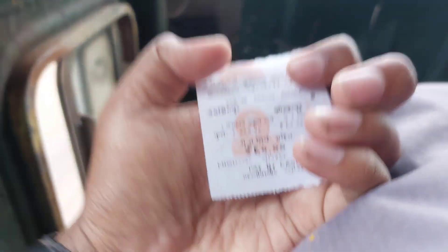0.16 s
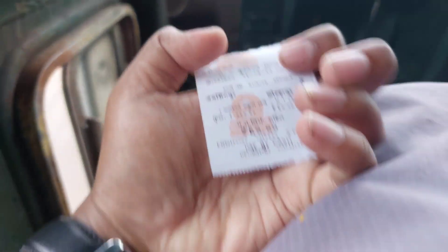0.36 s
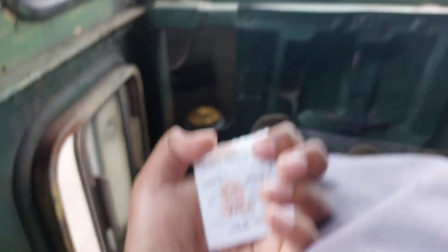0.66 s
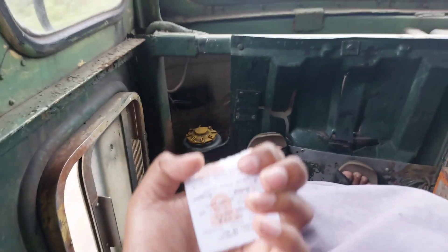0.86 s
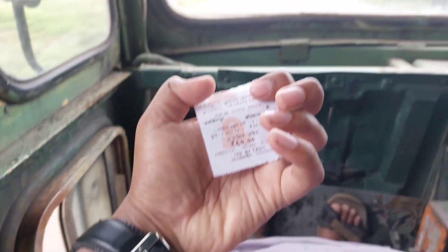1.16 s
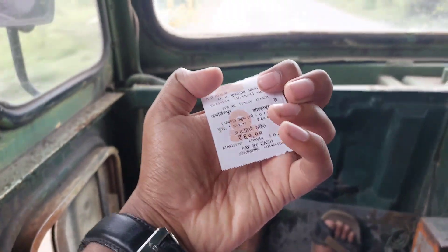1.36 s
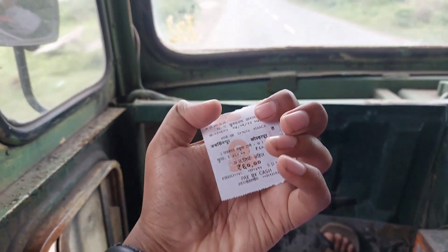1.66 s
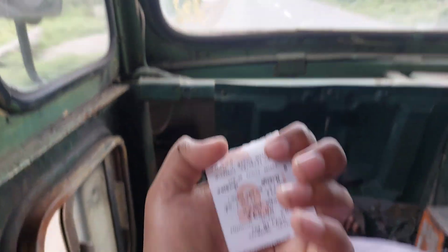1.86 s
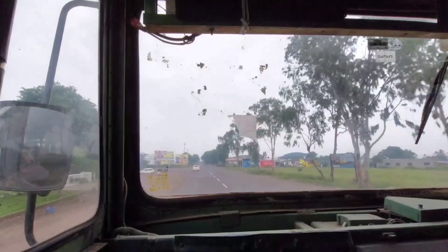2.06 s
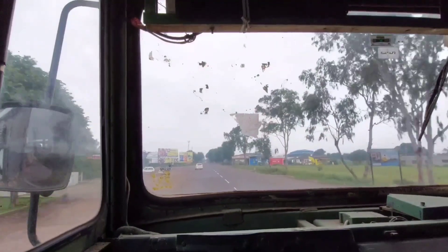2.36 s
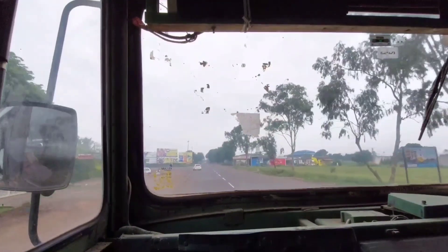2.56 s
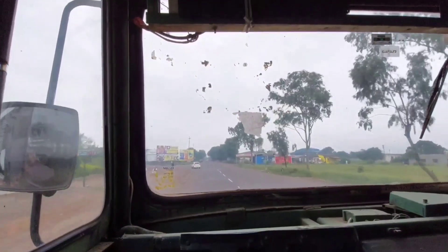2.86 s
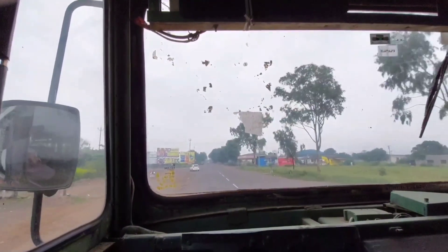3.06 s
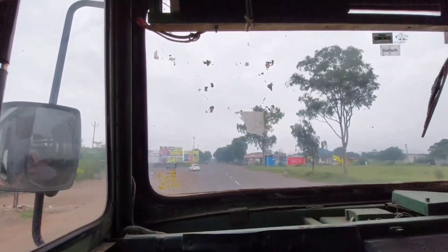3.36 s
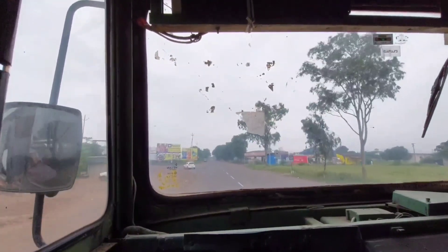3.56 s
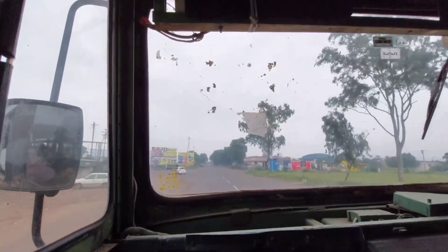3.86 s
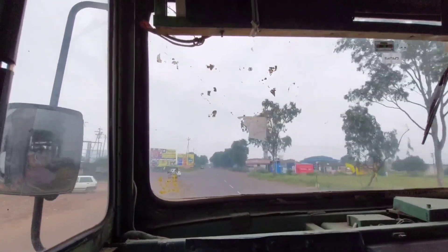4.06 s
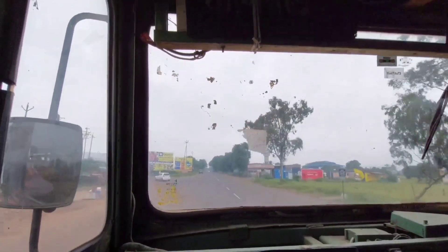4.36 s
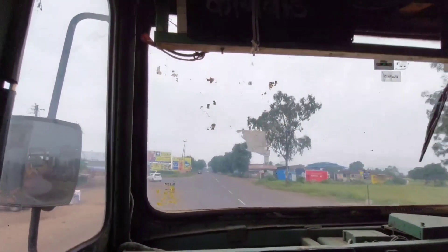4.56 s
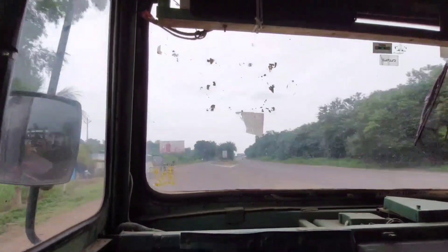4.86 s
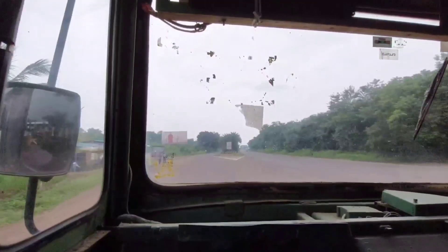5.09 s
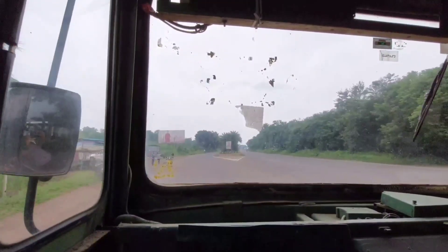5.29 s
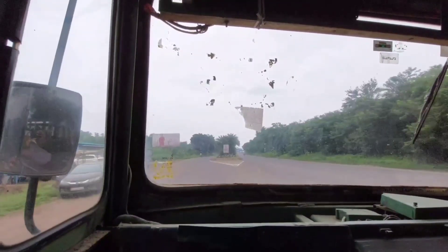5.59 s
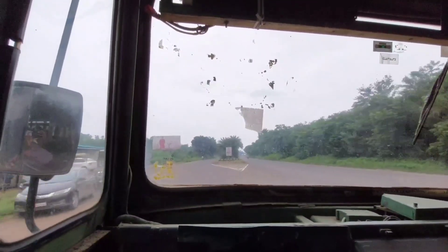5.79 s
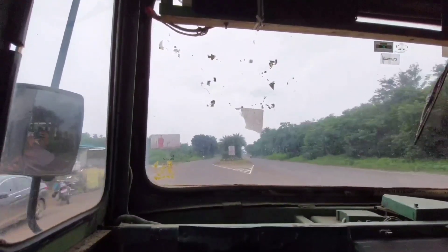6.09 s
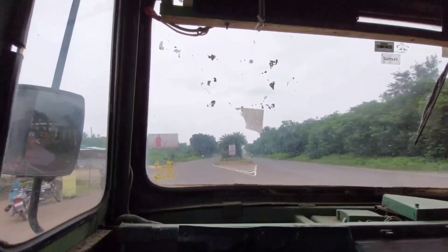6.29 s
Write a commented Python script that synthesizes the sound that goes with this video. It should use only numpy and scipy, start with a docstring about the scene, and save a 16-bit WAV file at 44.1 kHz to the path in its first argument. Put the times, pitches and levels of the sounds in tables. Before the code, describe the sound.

Inside a moving bus near the driver, a six-cylinder diesel drones loudly under low body rumble, road roar and wind hiss, with loose fittings rattling and metal squeaking. Just before two seconds a small hiss puff comes on the right and everything cuts to silence. Clicks bring back a far quieter ride, the engine sagging slowly, then another hard cut to a lower hum with a late rattle and squeak. Handheld wide stereo microphone.

```python
"""A six-cylinder diesel hums in crank orders inside a moving bus, heard from near the driver.
Three stretches of the ride are joined by hard cuts, the first loud and with a silence after it. Diffuse noise
makes body rumble, road roar and wind hiss; a turbocharger whines faintly on a gliding sine. Noise bursts
make ticks, rattles of loose fittings and a puff; wavering sines make squeaks and thin tones, and clicks are
decaying jumps. A two-port microphone hears the cabin, its ports less alike towards the treble."""
import sys
import numpy as np
from scipy import signal
from scipy.fft import rfft, irfft
from scipy.io import wavfile
from scipy.ndimage import uniform_filter1d, map_coordinates

SR = 44100
rng = np.random.default_rng(int(sys.argv[2]) if len(sys.argv) > 2 else 0)


def store_wav(level_fs):
    """Save 16-bit WAV to argv[1]."""
    pcm = np.round(np.clip(np.atleast_2d(level_fs), -1, 1) * 32767)
    wavfile.write(sys.argv[1], SR, pcm.T.astype(np.int16))


N = 283563

# the three stretches: (start t/s, end t/s, fade-in time/s, level the fade starts from/dB)
STRETCHES = [(0, 1.8088, .001, 0), (1.9498, 4.7822, .02, -20), (4.7822, 6.5, .018, -12)]
# cabin noise, one list a stretch: (t/s, rumble level/dB, roar level/dB, hiss level/dB, top hiss level/dB)
NOISE_LEVELS = [
    [(0, -20.5, -28.5, -39.5, -52), (.6, -21.5, -26.5, -37, -43.5), (1.1, -22, -27.5, -40, -51.5),
     (1.8, -22.5, -26.5, -39, -57.5)],
    [(1.97, -41, -49, -58, -77), (2.8, -44.5, -50.5, -59.3, -77), (4.4, -46.5, -49, -59.5, -76),
     (4.78, -42, -46.5, -56.5, -68)],
    [(4.81, -41.5, -51, -60, -82), (5.05, -41.5, -52, -59.5, -83), (5.4, -42.5, -54, -62, -83),
     (6.43, -43.5, -52, -61, -81)],
]
# cabin noise colour: (f/Hz, relative level per Hz/dB in each of the three stretches)
NOISE_COLOUR = [(40, -4, 5, -1), (62, 6.5, 9, 5), (138, -1, 2.5, -3.5), (258, 0.5, 3, -3.5),
                (363, -8, -9, -14), (534, -14, -12.5, -15), (740, -16.5, -15, -18),
                (1135, -17.5, -19, -19.5), (2360, -28, -26.5, -29), (3450, -34, -34, -35),
                (4920, -30, -34.5, -30.5), (7120, -39.5, -38.5, -41), (9700, -48.5, -48, -51.5),
                (12100, -42.5, -37.5, -46.5), (15600, -50.5, -39, -49)]
# panels and glass that ring along with the noise: (f/Hz, width/Hz, lift/dB in each of the three stretches)
PANELS = [(343, 13, 1.8, 3, 2.5), (489, 49, -0.76, 5.2, 3.4), (764, 58, 1.6, 3.9, 5), (856, 20, 2, 3, 0.67),
          (1066, 27, 1.5, 7.4, 6.3), (1243, 50, 0, 4.8, 3.2), (1482, 54, 0.5, 2, 6.8),
          (1605, 75, -2, 3.3, 1), (2160, 69, -0.5, 2.2, 2.2), (2560, 150, 0.5, 2.1, 2)]
SWELL_DB = 0.55  # slow random heave shared by all the noise bands, rms

# left over right, by how the hand holds the ports: (f/Hz, level/dB in each of the three stretches)
PORT_LEAN = [(99.5, -1, 0, 0.5), (800, -2, -1.5, -3), (2500, 1.5, 0.5, 4), (4460, -5.5, 0.5, -6),
             (6200, -5.5, -1, -5), (8300, 8, 4.5, 9), (11000, 0.5, 0, 3.5), (13000, 2.5, -5, 6),
             (15600, 15.5, 3, 10)]
# how alike the two ports hear the diffuse cabin: (f/Hz, likeness from 0 to 1)
PORT_LIKENESS = [(40, 0.93), (80, 0.94), (300, 0.78), (600, 0.42), (1000, 0.22), (1450, 0.394),
                 (2500, 0.13), (5000, .02)]
# phase of the right port against the left: (f/Hz, phase/rad)
PORT_PHASE = [(100, -0.07), (600, 0.14), (1000, -1.9), (1500, -2.5), (2300, -5.5), (3000, -5)]

# engine speed, one list a stretch; steady, then twice sagging slowly, with one short rev:
# (t/s, crank turns per s, hum strength/dB)
CRANK = [
    [(0, 24.47, 0), (.9, 24.56, 0), (1.8, 24.6, -1)],
    [(1.97, 23.0, -2), (2.4, 23.37, -1.5), (3.2, 23.0, 1.5), (4.5, 22.3, 1), (4.64, 23.4, -4),
     (4.78, 23.5, -9)],
    [(4.81, 20.1, -3), (5.14, 20.85, .5), (6.43, 19.65, .5)],
]
# crank orders that stand out of the rumble, firing on order 3; hum strength and pull come on top:
# (order, rms level/dB in each of the three stretches)
CRANK_ORDERS = [(3, -29, -55, -64), (4, -38, -58, -64), (4.5, -42, -55, -64), (6, -27, -42, -45),
                (7, -37, -62, -66), (7.5, -31, -52, -57), (8, -44, -62, -57), (9, -34, -54, -50),
                (10, -31, -55, -60), (10.5, -39, -55, -55), (11, -34, -62, -63), (12, -37, -47, -63),
                (13.5, -39, -68, -62), (15, -40, -62, -68), (16.5, -43, -72, -70), (17, -44, -74, -67),
                (22, -43, -72, -71), (24, -54, -68, -69), (27, -44, -76, -78), (31.5, -49, -76, -78),
                (36, -47, -72, -80), (37, -50, -78, -76), (42, -49, -80, -82), (49, -50, -80, -80),
                (51, -50, -80, -78), (72, -50, -82, -76)]
# orders that grow while the engine pulls hard, that is while the pedal aims above PULL_HZ
PULLING_ORDERS = (9, 10.5, 15, 16.5, 17)
PULL_DB, PULL_HZ, PULL_FADE_S = 8, 8500, .4
# each move of the pedal sets the pitch that the whine heads for: (t/s, aim f/Hz)
PEDAL = [(0, 9200), (.25, 11300), (.8, 9800), (.95, 6200), (4.5, 7900), (4.78, 5600)]
# turbocharger whine, one row a stretch: (starting f/Hz, rms level/dB)
TURBO = [(8450, -60), (7750, -74), (7950, -81)]
SPOOL_S = 1.3  # time constant of the glide

# high ticks: (t/s, starting rms level/dB)
TICKS = [(.1, -53), (2.38, -66), (4.755, -64), (4.97, -74), (5.638, -66), (5.77, -72), (5.942, -71),
         (6.165, -68), (6.205, -70)]
TICK_HZ, TICK_WIDTH_HZ, TICK_T60_S, TICK_PAN_DB = 12500, 4000, .1, 3
# wide rattles of loose fittings: (t/s, starting rms level/dB, centre f/Hz)
RATTLES = [(.408, -38, 4000), (.886, -33, 5500), (1.052, -37, 7000), (1.077, -35, 6000), (1.294, -37, 7500),
           (5.973, -57, 5540), (6.273, -63, 4500)]
RATTLE_WIDTH, RATTLE_T60_S, RATTLE_PAN_DB = 1.3, .12, -.5  # width as a share of the centre
# narrow squeaks: (t/s, starting rms level/dB, f/Hz, t60/s)
SQUEAKS = [(.795, -48, 9700, .08), (.886, -40, 3300, .08), (1.296, -36, 3300, .1), (5.972, -55, 4350, .15),
           (5.974, -53, 1440, .12), (5.985, -52, 1380, .12), (5.994, -53, 4390, .15)]
SQUEAK_WAVER = .025  # rms share of the pitch
# a puff of hiss on the right: (t/s, starting rms level/dB, centre f/Hz, width/Hz, t60/s, left over right/dB)
PUFF = (1.72, -35.5, 4920, 1500, 0.7, -12.5)
BURST = 8192  # samples that each tick, rattle, squeak and puff lasts at most
# clicks where a stretch sets in: (t/s, peak level/dB, sign)
CLICKS = [(1.9498, -38, 1), (1.9547, -35, -1), (1.9572, -42, 1), (1.962, -31, -1), (4.787, -44, 1),
          (4.802, -35, -1)]
CLICK_S = 0.00098  # decay time constant
# thin tones that come and go: (start t/s, end t/s, f/Hz, rms level/dB before the fades)
THIN_TONES = [(2.0, 5.5, 1104, -69), (3.93, 4.42, 1615, -66), (2.2, 3.4, 1600, -73), (3.0, 4.3, 2480, -76),
              (5.15, 5.35, 1440, -69)]
EDGE_HZ = 15780  # upper band limit


def gain_of(db):
    """Decibels to an amplitude factor."""
    return 10 ** (np.asarray(db) / 20)


def evened(x):
    """Scales to rms 1 on the mean of the channels."""
    return x / np.sqrt(np.mean(np.mean(np.atleast_2d(x), axis=0) ** 2) + 1e-20)


def read(points, hz, column=1):
    """Reads a table column on a log frequency axis."""
    table = np.transpose(points)
    return np.interp(np.log(hz + 1), np.log(table[0] + 1), table[column])


def follow(rows, t):
    """All columns of a curve table at times t."""
    s, *columns = np.transpose(rows)
    return [np.interp(t, s, column) for column in columns]


def drift(count, per_s):
    """Smooth random wander of rms 1 through per_s knots a second."""
    knots = rng.standard_normal(int(count * per_s / SR) + 4)
    return evened(map_coordinates(knots, [1 + np.arange(count) * per_s / SR], order=3))


def ports(hz, k):
    """Likeness, phase turn and left gain of the two ports; right gain is the inverse."""
    likeness = np.clip(read(PORT_LIKENESS, hz), 0, 1)
    turn = np.exp(1j * read(PORT_PHASE, hz))
    lean = gain_of(read(PORT_LEAN, hz, column=k + 1) / 2)
    return likeness, turn, lean


def tone(hz, db, k):
    """A sine that follows hz; it reaches the two ports by its own path, so with its own phase skew."""
    mean_hz = np.mean(hz)
    lean = ports(mean_hz, k)[2]
    phase = 2 * np.pi * (np.cumsum(hz) / SR + rng.random())
    skew = np.clip(.2 + mean_hz / 1500, 0, 1.3) * np.clip(rng.standard_normal(), -1.5, 1.5)
    pair = np.array([lean * np.cos(phase), np.cos(phase + skew) / lean])
    return gain_of(db) * evened(pair)


def decay(db, t60):
    """Level of a short sound: a quick soft onset, then a fall of 60 dB in t60 seconds."""
    u = np.arange(BURST) / SR
    return gain_of(db - 60 * u / t60) * (1 - np.exp(-u / .003))


def bursts(rows):
    """Noise around a centre pitch, unlike at the two ports, dying away exponentially."""
    out = np.zeros((2, N + BURST))
    hz = np.fft.rfftfreq(BURST, 1 / SR)
    for s, db, centre_hz, width_hz, t60, pan_db in rows:
        resonance = 1 / (1 + (2 * (hz - centre_hz) / width_hz) ** 2)
        band = evened(irfft(rfft(rng.standard_normal((2, BURST))) * resonance))
        pan = gain_of([[pan_db / 2], [-pan_db / 2]])
        out[:, round(s * SR):][:, :BURST] += band * decay(db, t60) * pan
    return out[:, :N]


def diffuse_spectrum(k, count):
    """Patchy noise frames of a diffuse field, coloured by the cabin and its ringing panels."""
    frames, hz = count // 512 + 8, np.fft.rfftfreq(2048, 1 / SR)[:, None]
    a, b, c, d, patches = rng.standard_normal((frames, len(hz), 5)).T
    patches = uniform_filter1d(patches, size=24, axis=0)  # across frequency
    patches = uniform_filter1d(patches, size=6, axis=1)  # across time
    patches = evened(patches.ravel()).reshape(a.shape)
    likeness, turn, lean = ports(hz, k)
    left, other = a + 1j * b, c + 1j * d
    right = likeness * turn * left + np.sqrt(1 - likeness ** 2) * other
    z = np.array([lean * left, right / lean])
    # the colour holds for both ports together
    z /= np.sqrt(lean ** 2 + lean ** -2. + 2 * likeness * turn.real)
    z *= gain_of(read(NOISE_COLOUR, hz, column=k + 1) + 0.92 * patches)
    for panel_hz, width_hz, *lift_db in PANELS:
        z *= gain_of(lift_db[k] / (1 + (2 * (hz - panel_hz) / width_hz) ** 2))
    return z, hz


def cabin(k, t, turns):
    """Rumble, roar and hiss: bands of one diffuse noise, throbbing a little with the firing."""
    z, hz = diffuse_spectrum(k, len(t))
    below = [0] + [1 / (1 + (hz / edge) ** 6) for edge in (400, 3000, 9000)] + [1]
    knock = np.cos(2 * np.pi * 3 * turns) + .6 * np.cos(2 * np.pi * 1.5 * turns)
    flutter = drift(len(t), per_s=22.)
    swell_db = SWELL_DB * drift(len(t), per_s=5.)  # one slow random heave shared by all noise bands
    knock_depths_db, flutter_depths_db = [.3, .6, .4, .4], [.4, .5, .35, .35]
    out = 0
    for lower, upper, db, knock_db, flutter_db in zip(below, below[1:], follow(NOISE_LEVELS[k], t),
                                                      knock_depths_db, flutter_depths_db):
        layer = signal.istft(z * np.sqrt(upper - lower), nperseg=2048, noverlap=1536)[1]
        layer = layer[:, 512:512 + len(t)]
        motion = gain_of(knock_db * knock + flutter_db * flutter + swell_db)
        out = out + gain_of(db) * evened(layer * motion)
    return out


def pedal_hz(t):
    """The pitch that the pedal asks of the turbocharger."""
    s, aim_hz = np.transpose(PEDAL)
    return aim_hz[np.searchsorted(s, t, side="right") - 1]


def engine(k, t, speed, strength_db):
    """Crank orders on one slightly uneven speed, each wavering a little in level."""
    speed = speed * (1 + .0012 * drift(len(t), per_s=4.))
    # shifted by half a fade, so that the centred average follows the pedal
    shifted = t - PULL_FADE_S / 2 * (t > PULL_FADE_S)
    pull = uniform_filter1d(1. * (pedal_hz(shifted) > PULL_HZ), size=round(PULL_FADE_S * SR))
    out = 0
    for order, *db in CRANK_ORDERS:
        level_db = db[k] + strength_db + PULL_DB * pull * (order in PULLING_ORDERS)
        out = out + tone(order * speed, level_db + .7 * drift(len(t), per_s=4.), k)
    return out


def turbocharger(k, t):
    """A faint unsteady whine whose pitch lags behind the pedal, as a first-order glide."""
    start_hz, db = TURBO[k]
    keep = np.exp(-1 / (SPOOL_S * SR))
    hz = signal.lfilter([1 - keep], [1, -keep], pedal_hz(t), zi=[keep * start_hz])[0]
    return tone(hz + 35 * drift(len(t), per_s=80.), db + 1.8 * drift(len(t), per_s=40.), k)


def ticks():
    """High, short noise bursts, leaning left."""
    return bursts([(s, db, TICK_HZ, TICK_WIDTH_HZ, TICK_T60_S, TICK_PAN_DB) for s, db in TICKS])


def rattles():
    """Loose fittings: short noise bursts, wider than their centre frequency."""
    return bursts([(s, db, hz, RATTLE_WIDTH * hz, RATTLE_T60_S, RATTLE_PAN_DB) for s, db, hz in RATTLES])


def squeaks():
    """Short rings of rubbed metal: decaying sines, a little unsteady in pitch."""
    out = np.zeros((2, N + BURST))
    for s, db, hz, t60 in SQUEAKS:
        waver = 1 + SQUEAK_WAVER * drift(BURST, per_s=300.)
        out[:, round(s * SR):][:, :BURST] += tone(hz * waver, db, 1) * decay(0, t60)
    return out[:, :N]


def puff():
    """One band of hiss on the right, falling more slowly than the ticks and rattles."""
    return bursts([PUFF])


def clicks(t):
    """Jumps that sink back exponentially, their edges slightly rounded."""
    jumps = 0
    for s, db, sign in CLICKS:
        jumps = jumps + sign * gain_of(db) * (t >= s) * np.exp(-abs(t - s) / CLICK_S)
    return uniform_filter1d(jumps, size=2)


def thin_tones(t):
    """Faint sines, wavering a little in pitch and level, that swell and fade."""
    out = 0
    for start, end, hz, db in THIN_TONES:
        swell = np.clip(np.minimum(t - start, end - t) / .06, 0, 1)
        out = out + swell * tone(hz + 2.96 * drift(N, per_s=8.), db + 3.0 * drift(N, per_s=7.9), 1)
    return out


def scene():
    """Each stretch but the first fades in quickly; a hard cut ends the first two."""
    t = np.arange(N) / SR
    mix = ticks() + rattles() + squeaks() + puff() + thin_tones(t)
    gate = np.zeros(N)  # silent between the first two stretches
    for k, (start, end, fade_s, from_db) in enumerate(STRETCHES):
        span = (t >= start) & (t < end)
        now = t[span]
        speed, strength_db = follow(CRANK[k], now)
        mix[:, span] += cabin(k, now, np.cumsum(speed) / SR)
        mix[:, span] += engine(k, now, speed, strength_db) + turbocharger(k, now)
        gate[span] = gain_of(from_db * np.clip(1 - (now - start) / fade_s, 0, 1))
    bass_cut = signal.butter(4, 42, "highpass", fs=SR, output="sos")  # the microphone hears no deep bass
    return signal.sosfilt(bass_cut, mix) * gate + clicks(t)


def record(dry):
    """The band limit: a steep linear-phase lowpass."""
    edge = signal.firwin(511, EDGE_HZ, window=("kaiser", 9), fs=SR)
    return signal.oaconvolve(dry, edge[None], "same")


dry = scene()
out = record(dry)
store_wav(out)
```